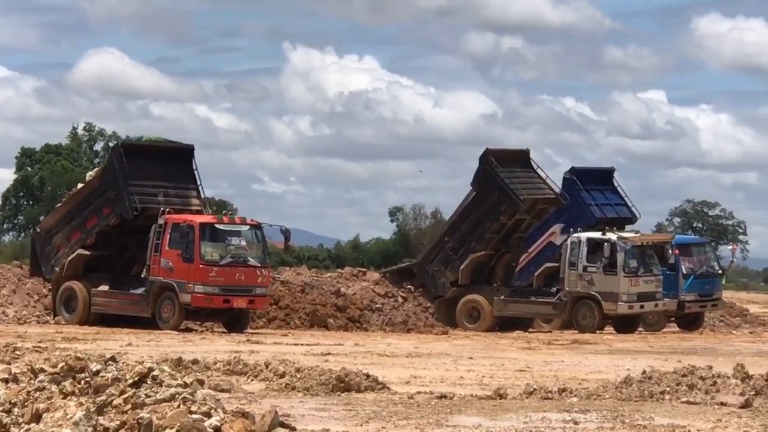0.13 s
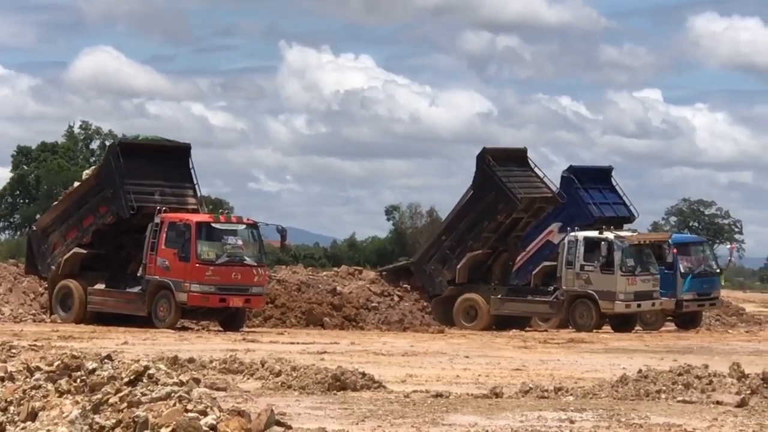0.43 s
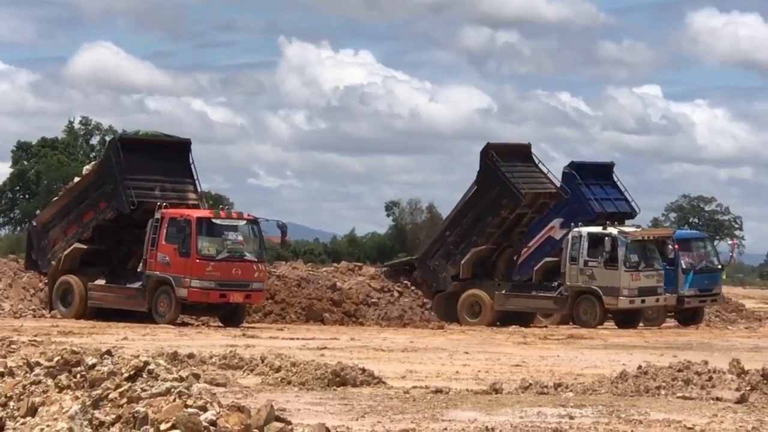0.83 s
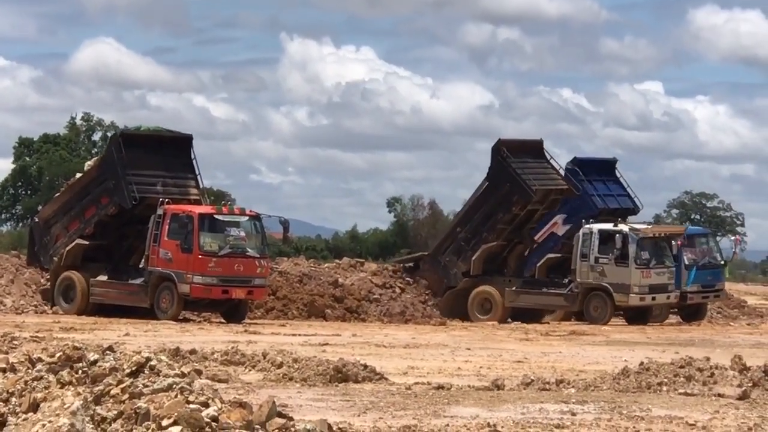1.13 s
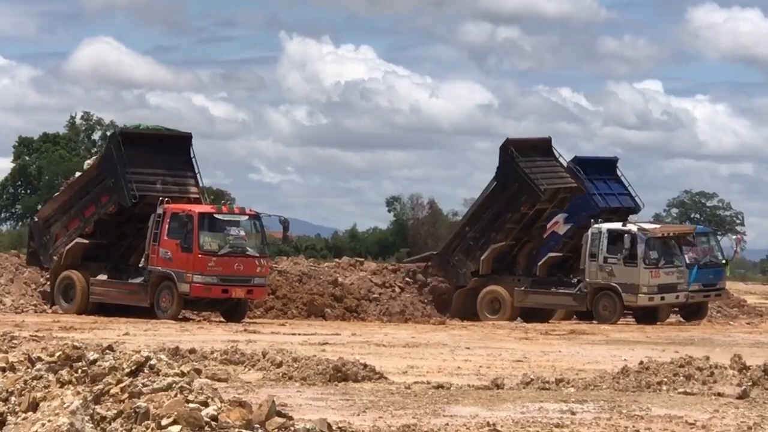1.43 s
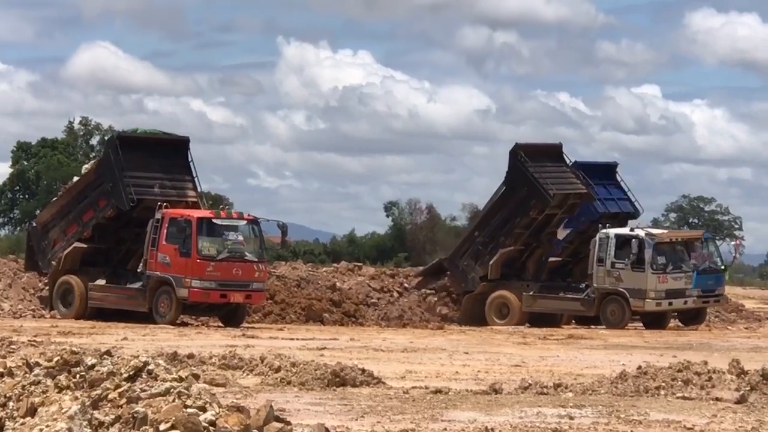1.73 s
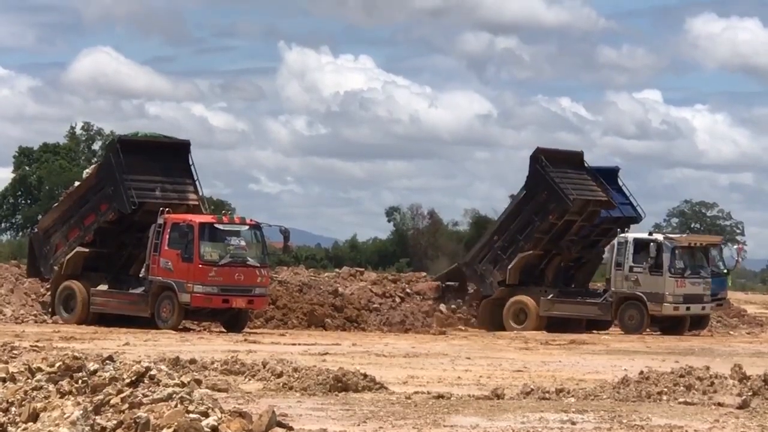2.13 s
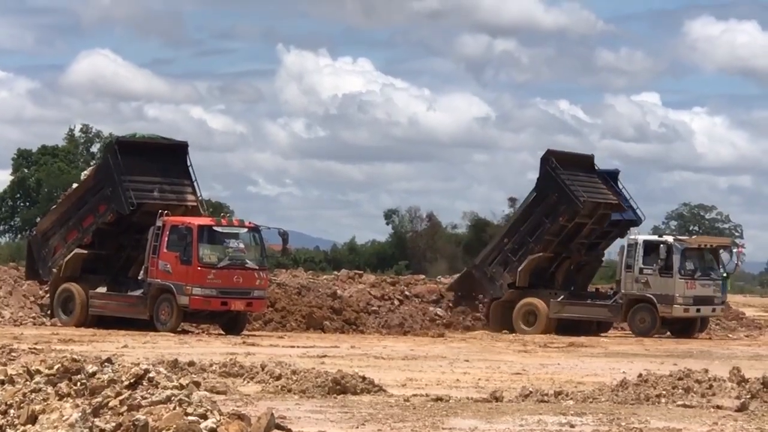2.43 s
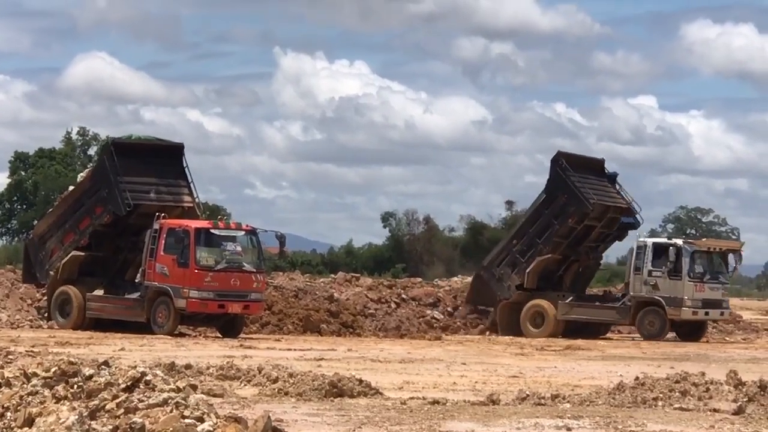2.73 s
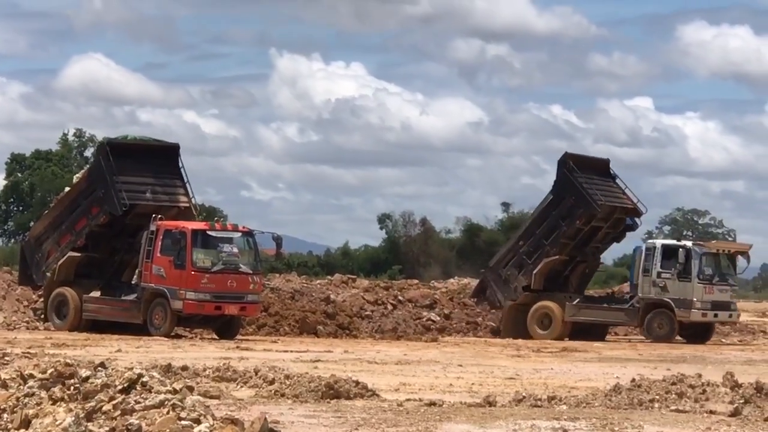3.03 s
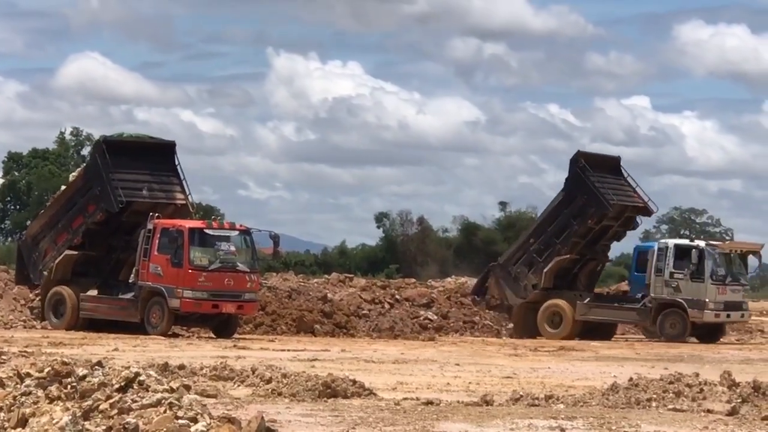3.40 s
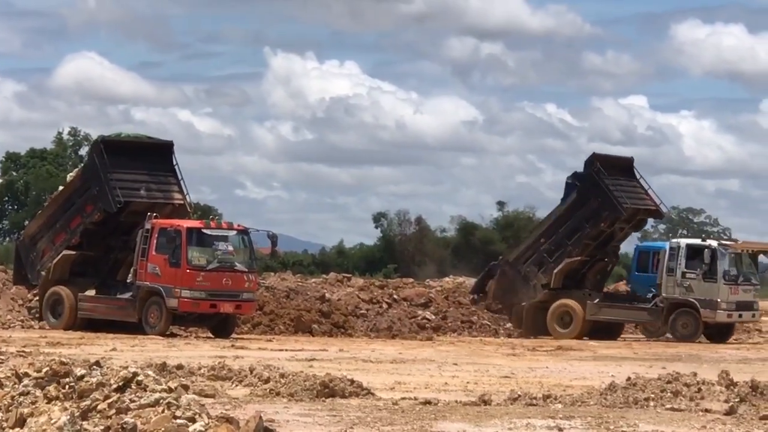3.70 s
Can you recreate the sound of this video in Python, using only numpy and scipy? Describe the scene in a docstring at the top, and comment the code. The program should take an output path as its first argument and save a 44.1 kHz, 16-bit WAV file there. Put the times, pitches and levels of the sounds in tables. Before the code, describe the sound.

Diesel tipper trucks rumble while soil slides out, then a steel tailgate slams loudly.

```python
"""Diesel engines run on an open dirt site, some way off, where tipper trucks unload.
One runs steadily while another pulls forward, slowly gaining speed. Its raised steel bed squeaks,
soil slides out with a few falling clods, and loose parts clink. Near the end the swinging tailgate
slams against the bed, which rings and thumps on the chassis."""
import sys
import numpy as np
from scipy import signal
from scipy.fft import rfft, irfft, next_fast_len
from scipy.io import wavfile

SR = 44100
rng = np.random.default_rng(int(sys.argv[2]) if len(sys.argv) > 2 else 0)


def transcribe(signal):
    """Save signal, clipped to [-1, 1], as a 16-bit WAV file at the path in sys.argv[1]."""
    frames = np.atleast_2d(signal).T
    limited = np.clip(frames, -1, 1)
    pcm = np.round(limited * 32767).astype(np.int16)
    wavfile.write(sys.argv[1], SR, pcm)


N = 170226
T = np.arange(N) / SR


def from_db(db):
    """Decibels to gain."""
    return 10 ** (np.asarray(db) / 20)


def rms_one(x):
    """Scale to unit rms."""
    return x / np.sqrt(np.mean(x ** 2) + 1e-20)


def in_time(rows):
    """Rows of (time_s, value) as a curve."""
    return np.interp(T, *np.transpose(rows))


def at_hz(rows, hz, column=1):
    """Read a table column on a log-frequency axis."""
    rows = np.array(rows)
    return np.interp(np.log(hz), np.log(rows[:, 0]), rows[:, column])


def drift(rate_hz):
    """Slow random motion, rms 1."""
    pole = np.exp(-2 * np.pi * rate_hz * 40 / SR)  # one point per 40 samples
    white = rng.standard_normal(N // 40 + 2002)
    slow = signal.lfilter([1], [1, -2 * pole, pole * pole], white)[2000:]
    return np.interp(np.arange(N) / 40, np.arange(len(slow)), rms_one(slow))


def colour(x, spectrum):
    """Filter by rows of (freq_hz, gain_db), steep past both ends; rms 1."""
    size = next_fast_len(N + SR // 2)
    hz = np.maximum(np.arange(size // 2 + 1) * SR / size, 1)
    low_hz, high_hz = .8 * spectrum[0][0], 1.2 * spectrum[-1][0]
    skirts = 1 / np.sqrt((1 + (low_hz / hz) ** 8) * (1 + (hz / high_hz) ** 8))
    return rms_one(irfft(rfft(x, size) * from_db(at_hz(spectrum, hz)) * skirts, size)[:N])


def bandpass(x, edges_hz):
    """One band of x, rms 1."""
    return rms_one(signal.sosfilt(signal.butter(2, edges_hz, "band", fs=SR, output="sos"), x))


def tone(hz):
    """Sine on a pitch curve, rms 1."""
    return np.sqrt(2) * np.sin(2 * np.pi * (np.cumsum(hz) / SR + rng.random()))


def sine_from(start_s, hz):
    """Sine with zero phase at start_s."""
    return np.sin(2 * np.pi * hz * (T - start_s))


def rasping(hz, depth, rate_hz):
    """Tone with randomly shaken level and phase, rms 1."""
    return rms_one(tone(hz) + depth * (drift(rate_hz) * tone(hz) + drift(rate_hz) * tone(hz)))


def dying(start_s, t60_s, hold_s=0):
    """Envelope: jump to 1, hold, decay."""
    return (T >= start_s) * from_db(-60 * np.clip((T - start_s - hold_s) / t60_s, 0, 3))


def arch(start_s, length_s):
    """Half-sine envelope."""
    return np.sin(np.pi * np.clip((T - start_s) / length_s, 0, 1))


def puffs(clicks, decay_s):
    """Short decay after each click, rms 1."""
    return rms_one(signal.lfilter([1], [1, -np.exp(-1 / (decay_s * SR))], clicks + 1e-18))


def firings(firing_hz, uneven_db, jitter_periods):
    """One click per firing; the cylinders differ in strength."""
    # Cylinders in firing order: gain_db
    cylinder_db = [3, -1.5, 3, 4.5, 4, 4.5]
    count = np.floor(np.cumsum(firing_hz) / SR + jitter_periods * drift(20))
    at = np.flatnonzero(np.diff(count) > 0)
    scatter_db = uneven_db * rng.standard_normal(N)[:len(at)]
    clicks = np.zeros(N)
    clicks[at] = from_db(np.resize(cylinder_db, len(at)) + scatter_db)
    return clicks


def exhaust(clicks, firing_hz):
    """Moving truck: gas pulses rumble through the pipe and boom at the firing rate."""
    # Pipe response: freq_hz, gain_db
    pipe = [(70, 1.5), (85, 4.5), (110, 5.5), (135, -1), (170, 3), (195, -7.5), (260, -6.5), (310, -14.5),
            (390, -31), (700, -36)]
    # Rumble envelope: time_s, gain_db
    rumble_db = [(0, -40.5), (1.85, -38), (2.03, -32), (2.2, -36.5), (2.8, -34), (3.45, -34), (3.86, -34.5)]
    # Boom envelope: time_s, level_db
    boom_db = [(0, -37), (.36, -35.5), (.7, -39.5), (.98, -33), (1.13, -43), (1.87, -40), (2.06, -35),
               (2.22, -44), (2.3, -35), (2.75, -30.5), (2.89, -33.5), (2.95, -48), (3.11, -26.5),
               (3.28, -40), (3.39, -27), (3.46, -43), (3.52, -23.5), (3.6, -41), (3.86, -25.5)]
    gas = rms_one(clicks) + puffs(clicks, decay_s=.013) * rng.standard_normal(N)
    rumble = from_db(in_time(rumble_db) - 1.5) * colour(gas, pipe)
    boom = from_db(in_time(boom_db)) * rasping(firing_hz, depth=.13, rate_hz=15)
    return rumble + boom


def hum(firing_hz):
    """Standing truck: wavering harmonics of the firing rate."""
    # Engine orders: multiple, level_db
    orders = [(1, -44), (2, -48), (3, -44)]
    return sum(from_db(db + 2.2 * drift(2.7)) * tone(k * firing_hz) for k, db in orders)


def whine():
    """Machinery tones that flicker in level."""
    # Whines: pitch_hz, level_db
    whines = [(468.5, -62.5), (1642, -63)]
    return sum(from_db(db + 4.7 * drift(7.5)) * tone(hz * (1 + .00392 * drift(11.3)))
               for hz, db in whines)


def clatter(engine_clicks):
    """Mechanical diesel noise, pulsing with each engine's firings."""
    # Clatter spectrum: freq_hz, gain_db
    spectrum = [(350, 2), (520, 2), (650, 3.5), (770, -3.5), (950, 4.5), (1220, 4.5), (1400, 3), (1600, 2),
                (2100, -3.5), (3000, -8.5), (4500, -13.5), (7000, -20), (10000, -44), (12000, -37.5)]
    pulsing = 1 + .17 * sum(puffs(clicks, decay_s=.012) for clicks in engine_clicks)
    return from_db(-45 + .5 * drift(1.2)) * colour(pulsing * rng.standard_normal(N), spectrum)


def drone():
    """Low noise of far engines."""
    # Drone spectrum: freq_hz, gain_db
    spectrum = [(20, -28), (32, -8), (45, 2.5), (66, -1.5), (85, -16.5), (125, 2.5), (200, -6.5),
                (290, -6.5), (400, -25.5)]
    return from_db(-37.5) * colour(rng.standard_normal(N), spectrum)


def engines():
    """Two diesels: one gains speed, one holds it."""
    # Truck pulling away: time_s, firing_hz
    speed = [(0, 41.5), (.4, 45), (1.05, 43.7), (1.6, 44.8), (1.85, 48), (2.4, 51.3), (2.9, 52.3),
             (3.4, 54), (3.65, 52.4), (3.86, 55)]
    moving_hz = in_time(speed) * (1 + .006 * drift(4))
    standing_hz = 69.6 * (1 + .0053 * drift(6.5))
    moving = firings(moving_hz, uneven_db=1.5, jitter_periods=.09)
    standing = firings(standing_hz, uneven_db=3, jitter_periods=.28)
    return exhaust(moving, moving_hz) + hum(standing_hz) + whine() + clatter([moving, standing]) + drone()


def soil(grains_per_s=6000, size_db=2.5, hiss=.6):
    """Dense grains of earth rub down the steel bed."""
    # Slide envelope: time_s, level_db
    slide_db = [(0, -54.5), (.42, -54), (.56, -54), (1.1, -51), (1.35, -46), (1.6, -47), (1.92, -47.5),
                (2.15, -51), (2.5, -51), (3, -52), (3.86, -55)]
    # Soil spectrum: freq_hz, gain_db
    spectrum = [(400, -43), (1000, -4), (1800, -0.5), (3000, -0.5), (5000, -8.5), (7500, -15), (10000, -17),
                (12000, -28.5)]
    hits = rng.random(N) < grains_per_s / SR
    sizes = from_db(size_db * np.minimum(rng.exponential(1, N), 4))
    grains = rms_one(hits * sizes * rng.choice([-1, 1], N))
    return from_db(in_time(slide_db)) * colour(grains + hiss * rng.standard_normal(N), spectrum)


def hinge_squeal(rasp=.45, rasp_hz=140, edge_s=.008):
    """The bed's dry hinge sticks and slips between close tones, under a thin whistle."""
    # Hinge tones: start_s, length_s, pitch_hz, level_db
    squeals = [(.29, .04, 4600, -60), (.52, .07, 4610, -55.5), (.697, .028, 4870, -53),
               (.716, .034, 4680, -48), (.736, .06, 4740, -53.5), (.785, .13, 4960, -51.5),
               (.812, .052, 4790, -49.5), (.898, .055, 4890, -51.5), (.938, .075, 4590, -52),
               (.945, .09, 4880, -58)]
    # Whistle envelope: time_s, level_db
    whistle_db = [(.485, -72), (.515, -56), (.545, -74), (.58, -59), (.64, -56), (.73, -62), (.94, -62),
                  (1, -77)]
    whistle = rasping(9910 * (1 + .004 * drift(55)), rasp, rasp_hz)
    sounding = (T > whistle_db[0][0]) * (T < whistle_db[-1][0])
    out = from_db(in_time(whistle_db)) * sounding * whistle
    for start_s, length_s, hz, db in squeals:
        gate = np.clip(np.minimum(T - start_s, start_s + length_s - T) / edge_s, 0, 1)
        out += from_db(db) * gate * rasping(hz * (1 + .005 * drift(137)), rasp, rasp_hz)
    return out


def squeaks(wobble=.0417, slip_hz=350):
    """Dry steel slips in short tones of unsteady pitch."""
    # Squeaks: start_s, length_s, pitch_hz, level_db, roughness
    slips = [(.44, .045, 7520, -58, .1), (.7, .032, 2630, -47.5, .35), (.75, .065, 2570, -49.5, .4),
             (.89, .07, 10150, -62, .4), (.94, .07, 2290, -51, .9), (3.488, .042, 6650, -43.5, .06),
             (3.652, .03, 1790, -43, .9)]
    return sum(from_db(db) * arch(start_s, length_s) * tone(hz * (1 + rough * wobble * drift(slip_hz)))
               for start_s, length_s, hz, db, rough in slips)


def scrapes(relative_width=.14):
    """Steel and stone rub: friction noise in one resonance, swelling and fading."""
    # Scrapes: start_s, length_s, centre_hz, level_db
    rubs = [(0.535, 0.06, 2290, -47), (0.5, 0.11, 4570, -58), (0.54, 0.48, 2280, -54.5),
            (.8, .3, 1190, -50), (1.578, 0.016, 7500, -52)]
    edge_ratio = 1 + relative_width / 2
    out = np.zeros(N)
    for start_s, length_s, hz, db in rubs:
        friction = bandpass(rng.standard_normal(N), [hz / edge_ratio, hz * edge_ratio])
        out += from_db(db) * arch(start_s, length_s) * friction
    return out


def knocks(pitch_spread=.113):
    """Clods and stones hit the bed; each rings three close modes."""
    # Impacts: start_s, gain_db, centre_hz
    clods = [(1.022, -41, 1140), (1.066, -43, 3100), (1.736, -42, 1100), (1.979, -36.5, 930),
             (1.985, -37, 520)]
    out = np.zeros(N)
    for start_s, db, hz in clods:
        modes_hz = hz * (1 + pitch_spread * rng.standard_normal(3))
        ring = sum(sine_from(start_s, mode_hz) for mode_hz in modes_hz)
        out += from_db(db) / 2 * dying(start_s, t60_s=.04) * ring
    return out


def clinks():
    """Loose steel parts ring briefly and are damped at once."""
    # Clinks: start_s, level_db, pitch_hz
    parts = [(1.978, -39, 1350), (2.038, -41, 1600), (2.1265, -32.5, 1210), (2.133, -41, 1570)]
    return sum(from_db(db) * dying(start_s, t60_s=.015, hold_s=.006) * sine_from(start_s, hz)
               for start_s, db, hz in parts)


def plate_crash(blows, rebound_cut_hz=4300):
    """Struck steel plates: decaying noise bands, duller for blows after the hardest."""
    # Plate response: freq_hz, density_db, t60_s
    plates = [(150, 9, 0.3), (397, -4.5, 0.95), (749.7, -4.5, 0.35), (950, -1.5, 0.33), (1900, -6, 0.46),
              (3000, -10, 0.37), (4502, -10.5, 0.25), (8500, -20.5, 0.093), (12000, -31, .07)]
    edges_hz = np.geomspace(110, 12500, 15)
    centres_hz = np.sqrt(edges_hz[1:] * edges_hz[:-1])
    gains = from_db(at_hz(plates, centres_hz)) * np.sqrt(np.diff(edges_hz))
    gains *= from_db(-25) / np.linalg.norm(gains)
    slam_s = max(blows, key=lambda row: row[1])[0]
    white = rng.standard_normal((2, N))  # adjacent bands use independent noise
    out = np.zeros(N)
    for k, hz in enumerate(centres_hz):
        t60_s = at_hz(plates, hz, column=2)
        dulling = (hz / rebound_cut_hz) ** 2
        power = sum((from_db(db) * dying(start_s, t60_s) / (1 + (start_s > slam_s) * dulling)) ** 2
                    for start_s, db in blows)
        out += gains[k] * bandpass(white[k % 2], edges_hz[k:k + 2]) * np.sqrt(power)
    return out


def bed_ring(blows, build_s=.012, flutter_hz=7.05):
    """The bed's modes build up after each blow and waver as they decay."""
    # Bed modes: pitch_hz, gain_db, t60_s
    modes = [(67.1, -28, 0.13), (116, -30.5, 2.7), (134.2, -27, .6), (175.1, -24, 0.34), (259, -27.5, 0.63),
             (331, -30.5, 0.25), (522.4, -36, 0.25), (614, -36, 0.42), (887, -36, 0.33), (980, -31, 0.13),
             (1190, -40.5, 0.26), (1488, -38.5, 0.41), (1950, -35.5, 0.19), (2595, -37.5, 0.16),
             (3040, -36.5, .15)]
    pole = np.exp(-1 / (build_s * SR))
    out = np.zeros(N)
    for hz, gain_db, t60_s in modes:
        power = sum((from_db(db) * dying(start_s, t60_s)) ** 2 for start_s, db in blows)
        swell = signal.lfilter([1 - pole], [1, -pole], np.sqrt(power) + 1e-18)
        out += from_db(gain_db - 3 + 2 * drift(12.5)) * swell * tone(hz + flutter_hz * drift(32.7))
    return out


def tailgate():
    """The tailgate scrapes, slams and rebounds, exciting plates and bed."""
    # Blows: start_s, gain_db
    blows = [(3.487, -13), (3.5, -10), (3.513, -5), (3.517, -5), (3.528, -10.5), (3.556, -6.5),
             (3.577, -9.5), (3.604, -10.5), (3.657, -24)]
    return plate_crash(blows) + bed_ring(blows)


def cracks():
    """The tailgate's edges strike the bed: brief bright noise bursts."""
    # Edge strikes: start_s, level_db
    strikes = [(3.511, -33), (3.518, -26), (3.5275, -28), (3.615, -39)]
    # Crack spectrum: freq_hz, gain_db
    spectrum = [(1000, 3.5), (1900, 8.5), (3300, 4), (5000, -6.5), (8500, -10.5), (11500, -19)]
    power = sum((from_db(db) * dying(start_s, t60_s=.04)) ** 2 for start_s, db in strikes)
    return np.sqrt(power) * colour(rng.standard_normal(N), spectrum)


def thumps(rise_s=.0081):
    """The bed hits the chassis: low tones that swell and die in a few cycles."""
    # Thumps: start_s, level_db, pitch_hz
    blows = [(3.575, -28, 136), (3.66, -20.5, 169.5)]
    out = np.zeros(N)
    for start_s, db, hz in blows:
        age = np.maximum(T - start_s, 0) / rise_s
        out += from_db(db) * age * np.exp(1 - age) * sine_from(start_s, hz)
    return out


def scene():
    """All sources in open air, mono."""
    tipping = soil() + hinge_squeal() + squeaks() + scrapes() + knocks() + clinks()
    return (engines() + tipping + tailgate() + cracks() + thumps())[None]


def record(dry, low_cut_hz=36, high_cut_hz=11900):
    """The microphone drops the deepest bass; the top is cut steeply."""
    thinned = signal.sosfilt(signal.butter(6, low_cut_hz, "high", fs=SR, output="sos"), dry)
    return signal.sosfilt(signal.ellip(10, .2, 80, high_cut_hz, fs=SR, output="sos"), thinned)


dry = scene()
out = record(dry)
transcribe(out)
```